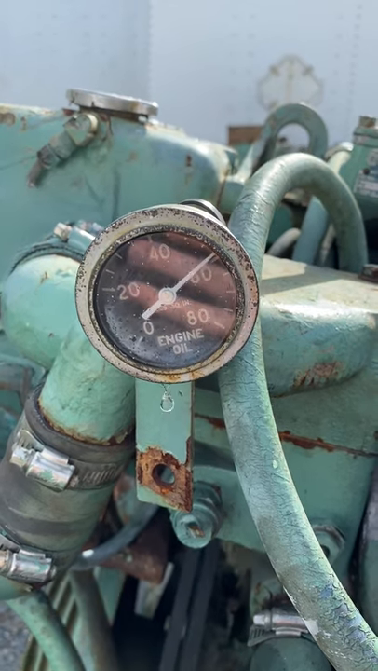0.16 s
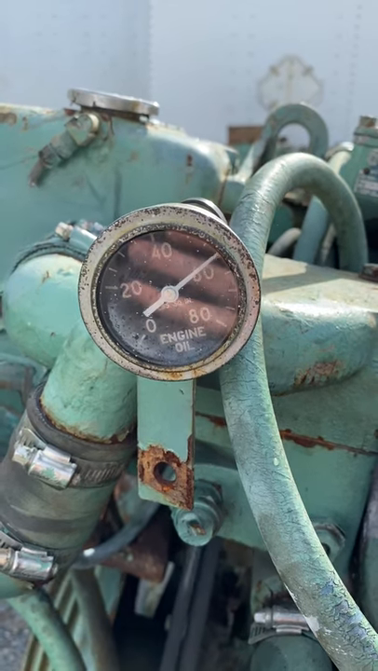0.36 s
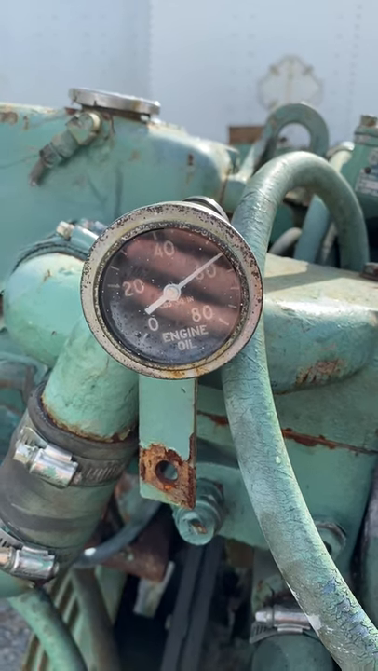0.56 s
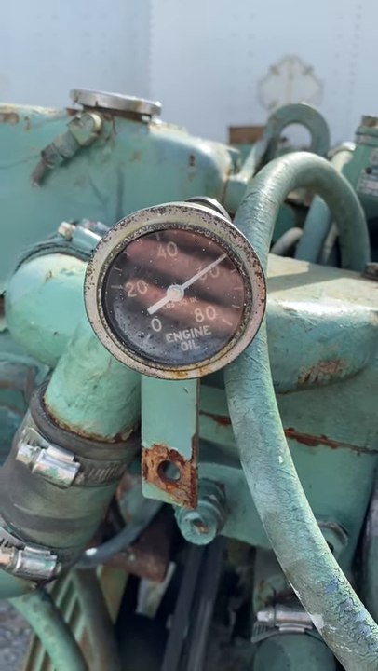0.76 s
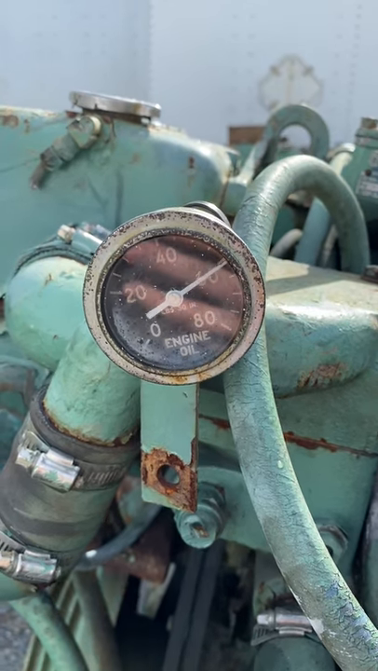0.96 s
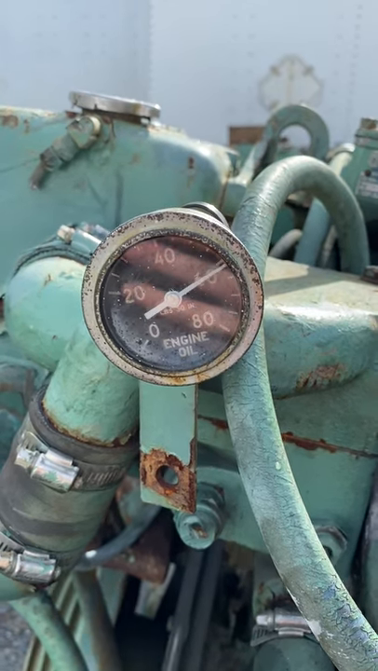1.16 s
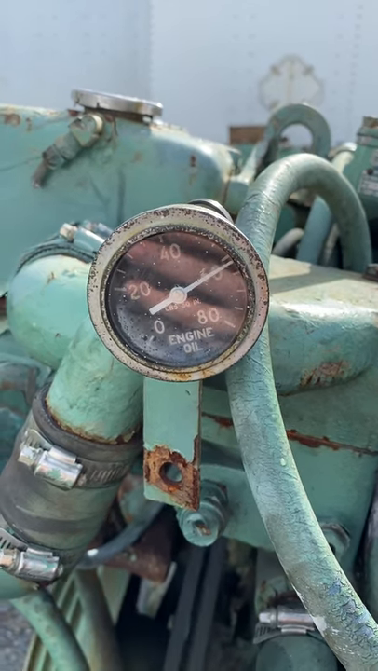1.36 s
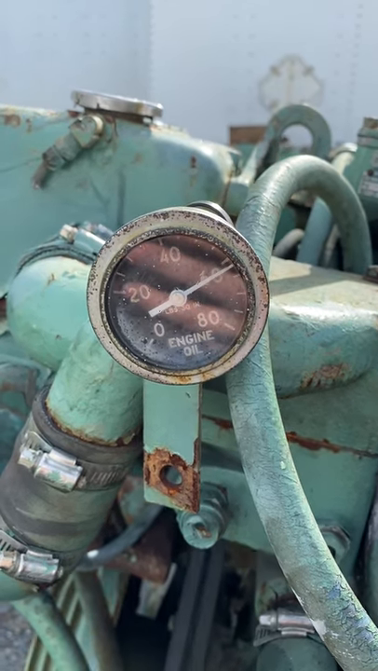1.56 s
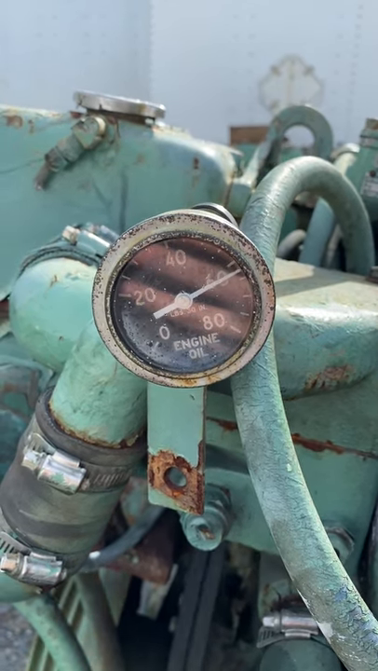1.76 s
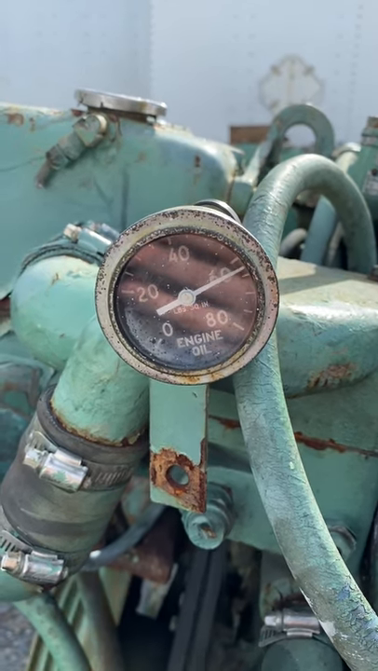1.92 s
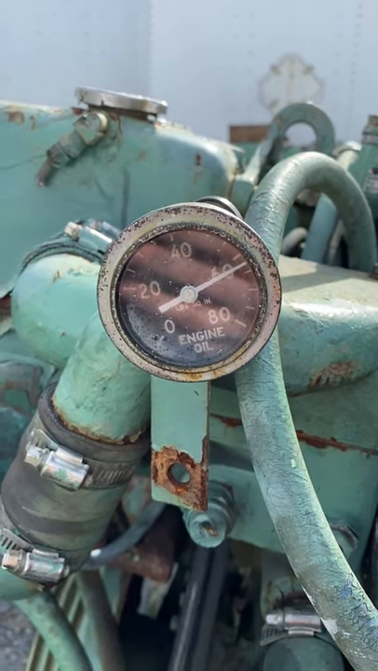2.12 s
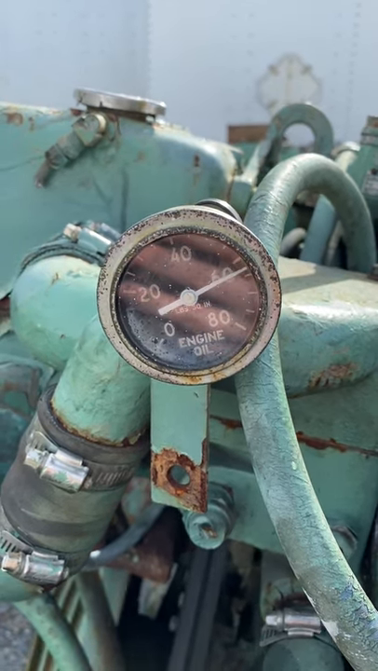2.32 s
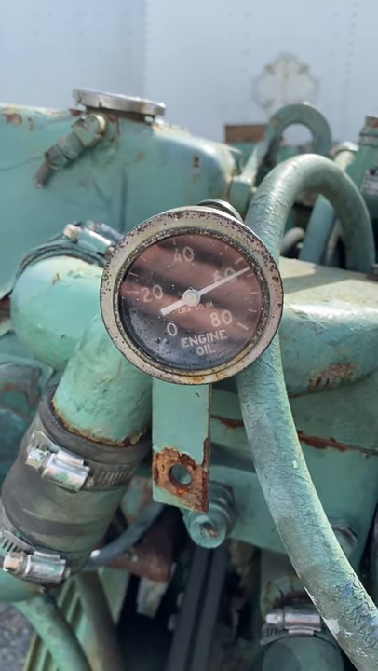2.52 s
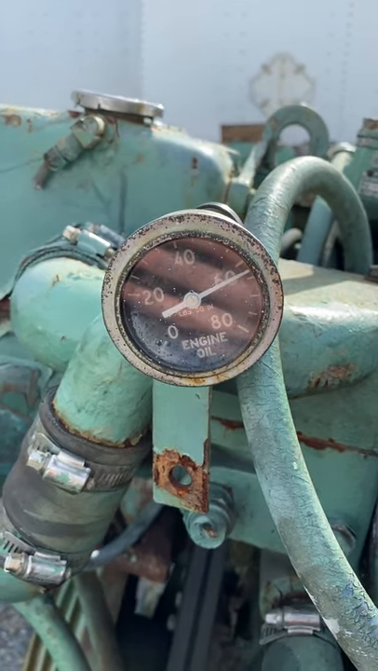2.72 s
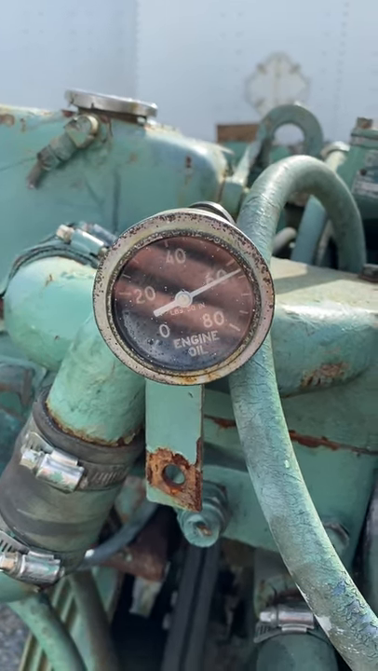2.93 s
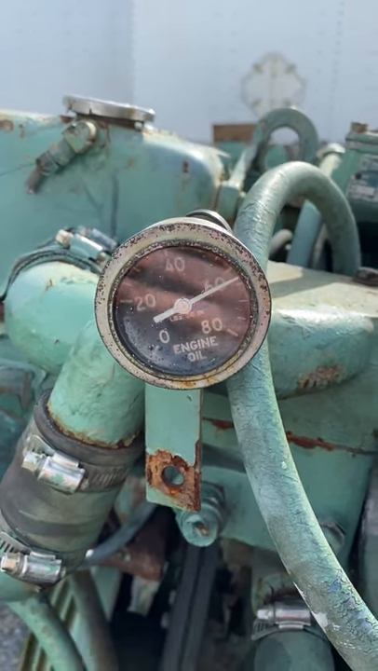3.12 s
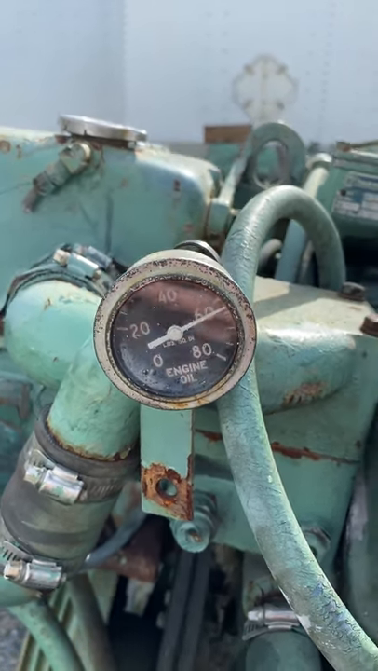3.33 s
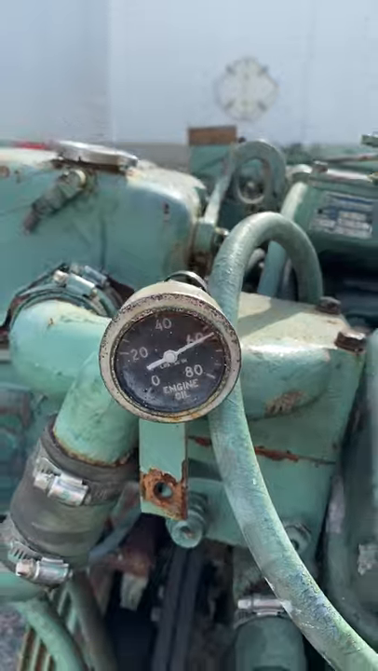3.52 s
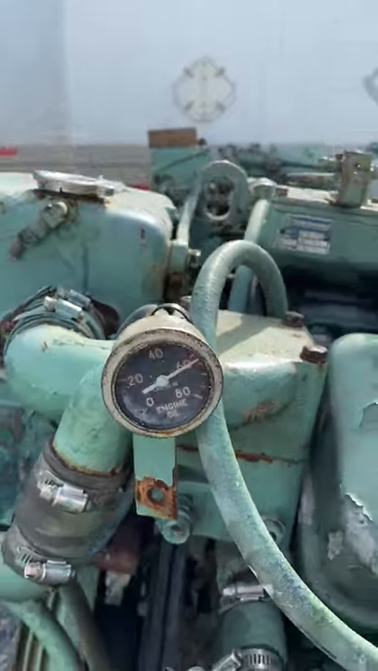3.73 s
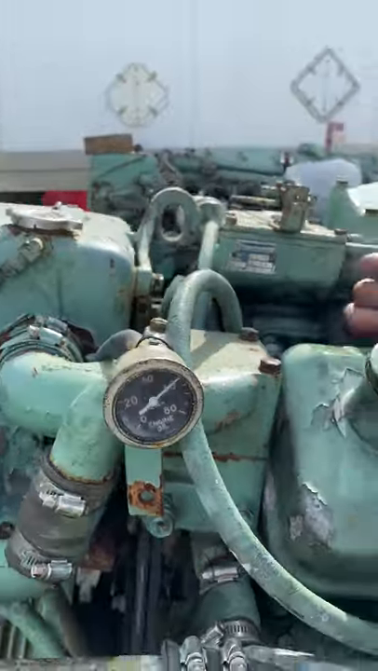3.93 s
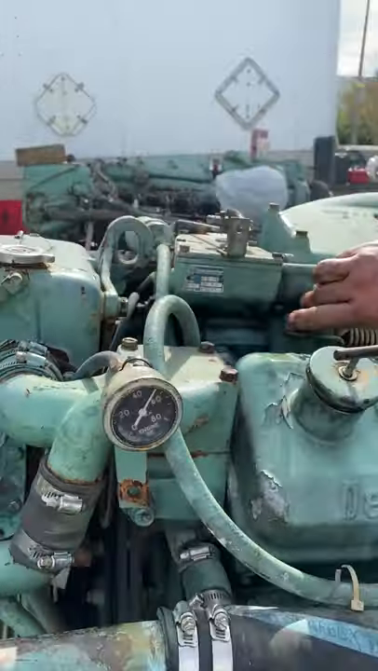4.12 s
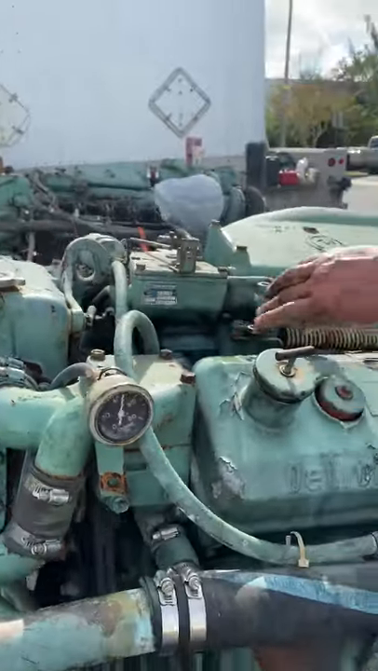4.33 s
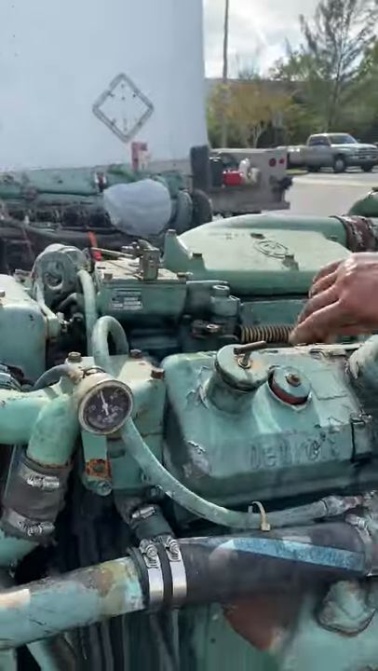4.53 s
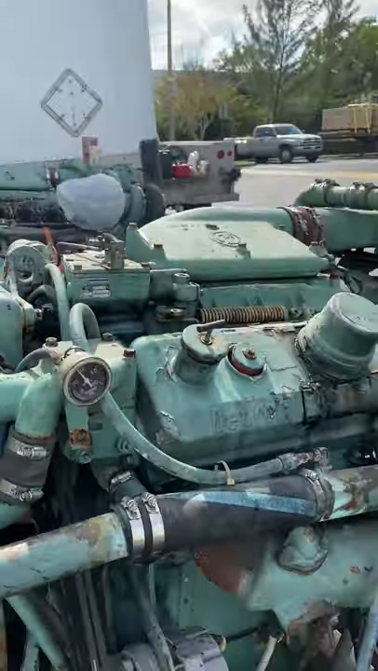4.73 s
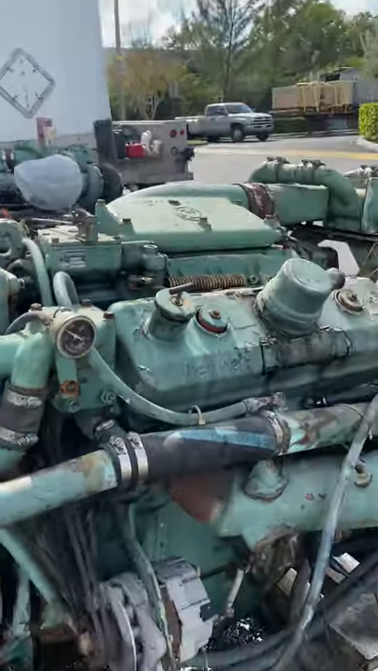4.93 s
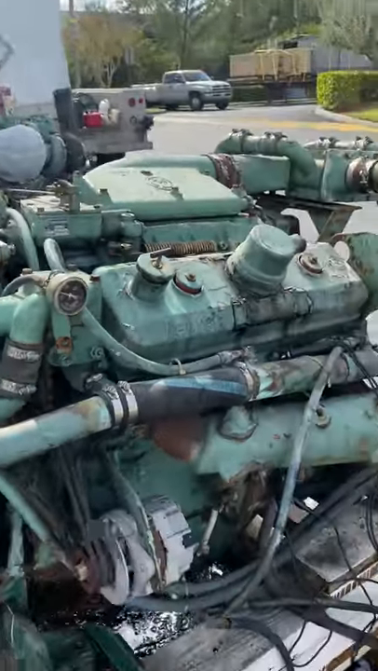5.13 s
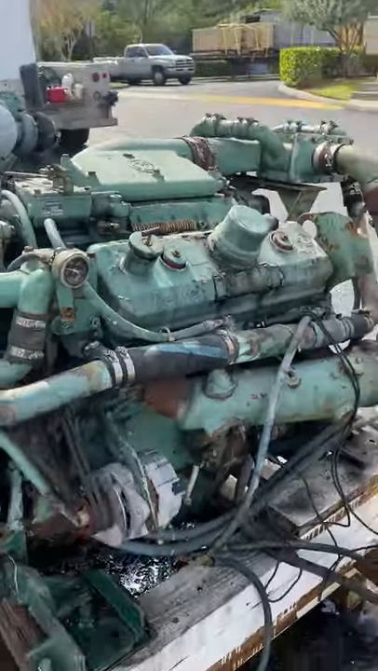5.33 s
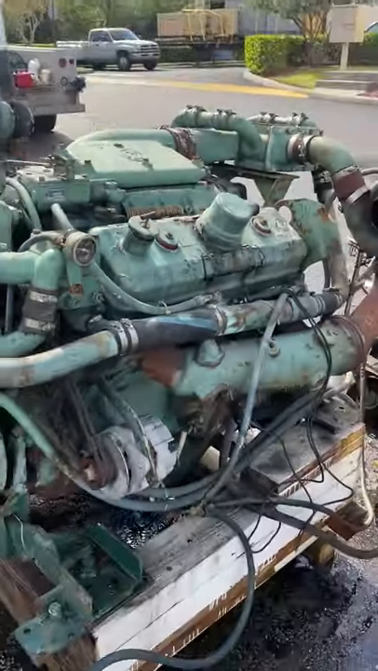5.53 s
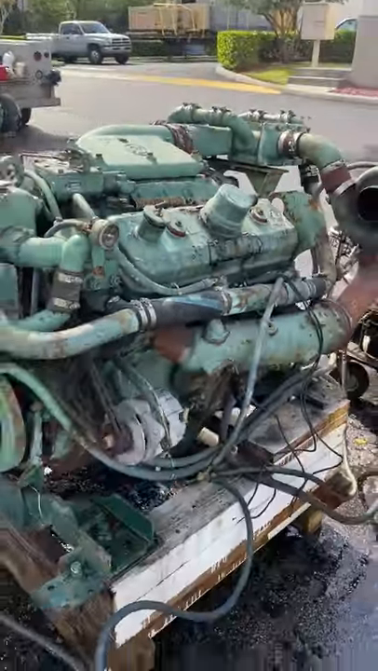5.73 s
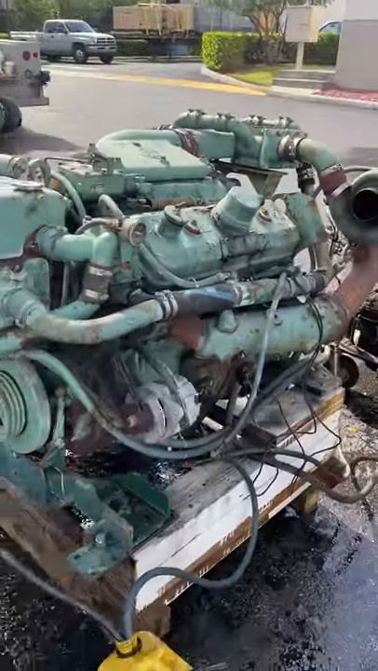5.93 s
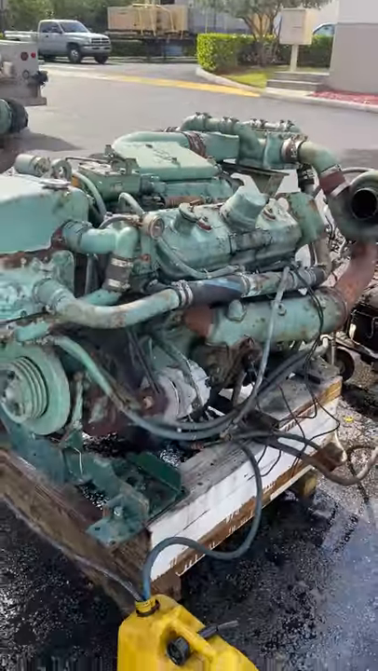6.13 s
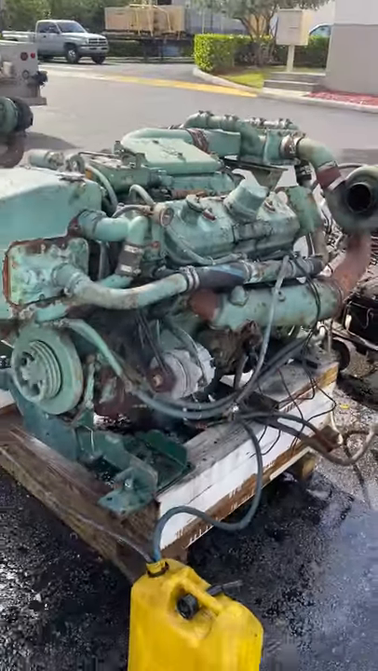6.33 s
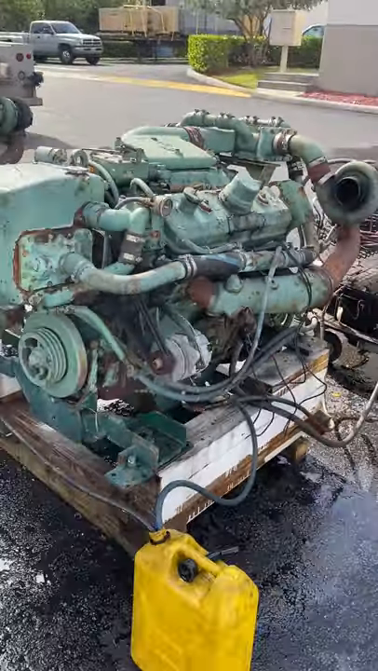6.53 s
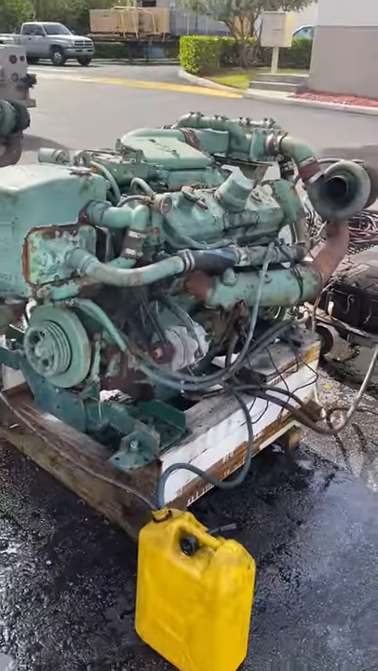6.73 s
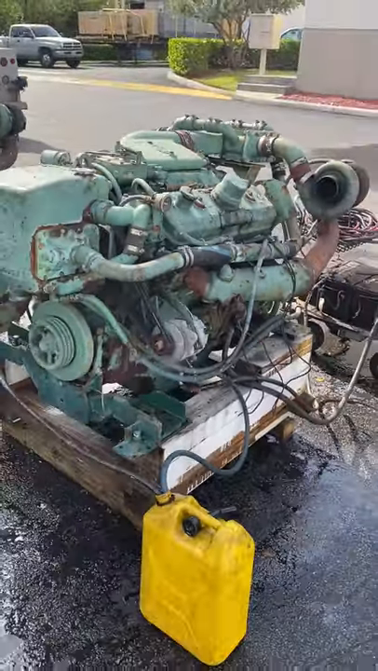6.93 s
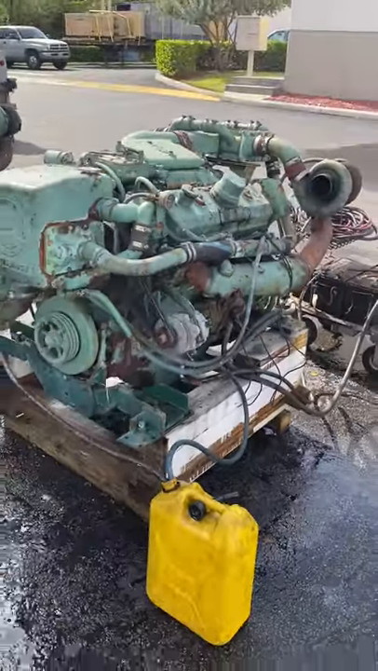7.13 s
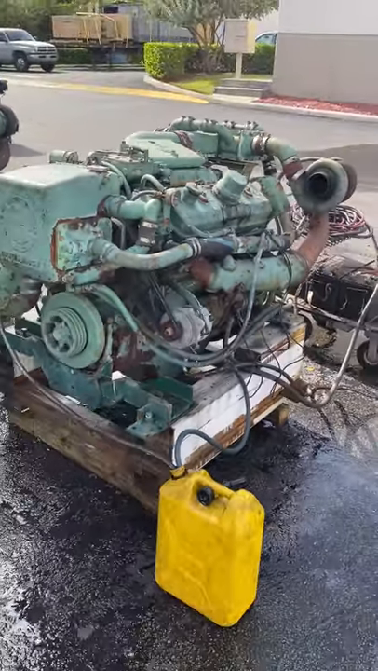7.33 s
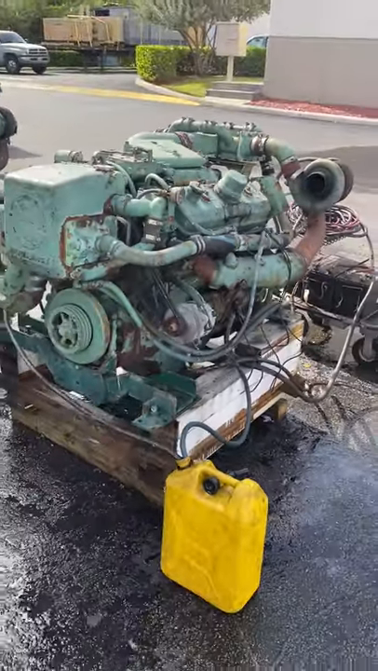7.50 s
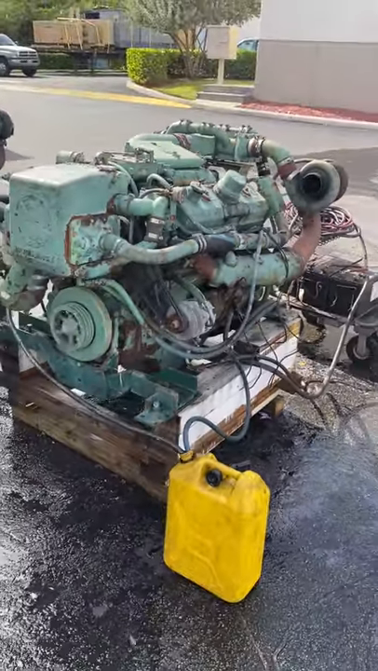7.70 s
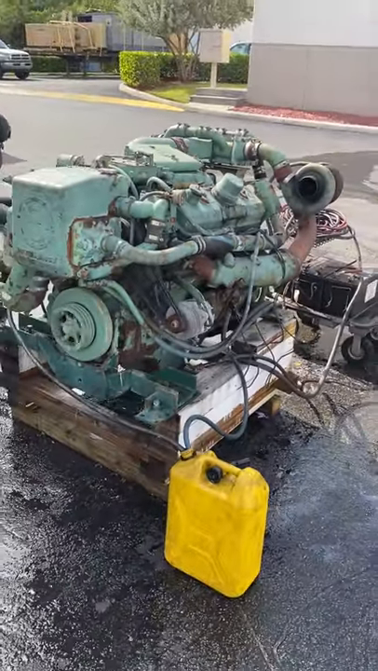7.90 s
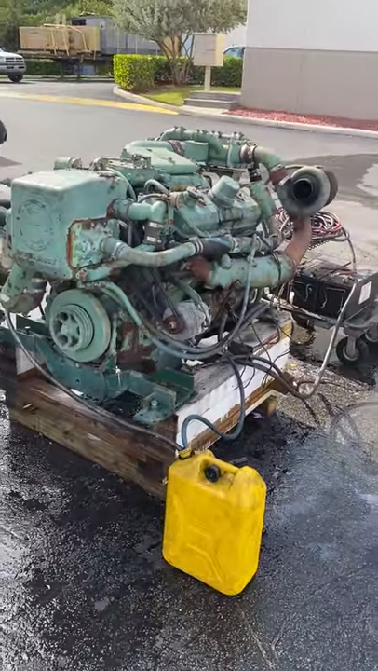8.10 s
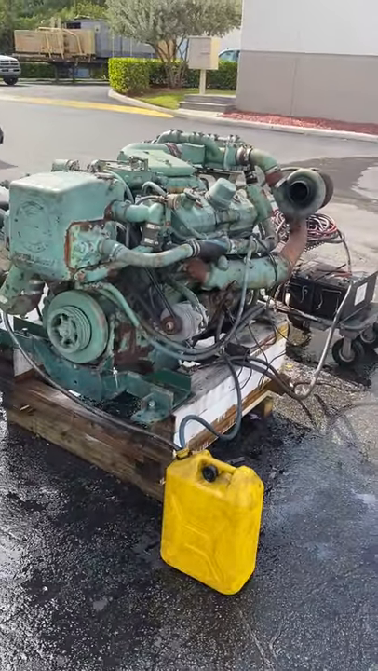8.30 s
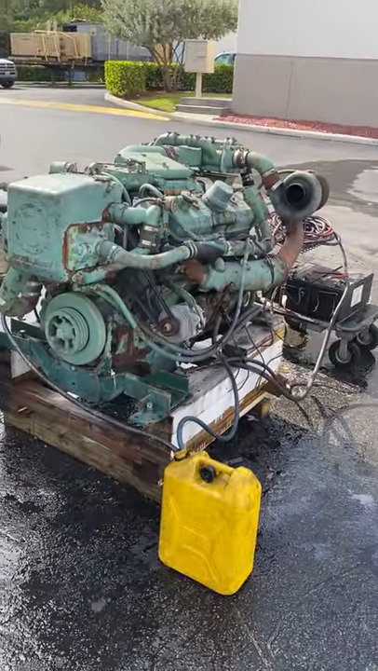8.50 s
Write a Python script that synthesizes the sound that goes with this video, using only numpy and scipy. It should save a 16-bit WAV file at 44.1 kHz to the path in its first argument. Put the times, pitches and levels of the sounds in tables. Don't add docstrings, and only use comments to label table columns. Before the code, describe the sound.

Loud throbbing diesel engine at raised revs winds down quickly, nearly stalls, then chugs on at a slow, clattering idle as the listener backs away.

```python
import sys
import numpy as np
from scipy import signal
from scipy.io import wavfile
from scipy.ndimage import uniform_filter1d

SR = 44100
rng = np.random.default_rng(int(sys.argv[2]) if len(sys.argv) > 2 else 0)


def linear_from_db(decibels):
    return 10 ** (np.asarray(decibels, float) / 20)


def generate_wav(signal):
    frames = np.transpose(np.atleast_2d(signal))
    scaled = np.clip(frames, -1, 1) * 32767
    pcm = np.round(scaled).astype(np.int16)
    wavfile.write(sys.argv[1], SR, pcm)


N = 377275
TIME = np.arange(N) / SR
FFT_SIZE, HOP = 1024, 256
HZ, FRAME_S = np.fft.rfftfreq(FFT_SIZE, 1 / SR), np.arange(N // HOP + 2) * HOP / SR

# time_s, speed_turns_per_s
CRANK_SPEED = [(0, 20.391), (.29, 20.809), (.92, 21.014), (1.28, 22.752), (2.02, 22.937), (2.49, 23.858),
               (3.54, 23.699), (3.84, 20.026), (4.23, 15.939), (4.62, 12.282), (4.92, 9.953), (5.38, 11.27),
               (5.56, 11.546), (6.22, 11.292), (7.56, 11.272), (8.56, 11.149)]
FLYWHEEL_S = 0.1
# time_s, level_db
EFFORT = [(0, -14.5), (.16, -14), (.8, -14), (1.26, -13), (1.62, -15.5), (2.38, -14.5), (3.52, -15.5),
          (3.64, -19), (3.76, -20), (4.07, -22.5), (4.45, -24.5), (4.83, -27), (5.05, -22.5), (5.25, -22),
          (5.86, -25), (6.79, -26.5), (7.98, -26.5), (8.55, -26)]
HELD_DB, HELD_SPEED = -14.5, 22.5
# time_s, fuel_cut_0_to_1, overload_0_to_1
GOVERNOR = [
    (0, 0, 0),
    (3.52, 0, 0),
    (3.7, 1, 0),
    (4.75, 1, 0),
    (4.9, 0, 1),
    (5.8, 0, 1),
    (6.3, 0, 0),
]
# speed_turns_per_s, range (0 idle, 1 low, 2 middle, 3 high)
REV_RANGES = [(12, 0), (20, 1), (21.05, 1), (22.7, 2), (23, 2), (23.7, 3)]
# time_s, distance (0 near, 1 far), right_port_shading (0-1)
WALK = [
    (0, 0.16, 0.24),
    (3.5, 0.026, 0.19),
    (4.5, 0.61, 0.44),
    (5.5, 0.58, 0.53),
    (6.5, 0.7, 0.57),
    (8.6, 0.79, 0.43),
]

# idle_db, low_db, middle_db, high_db (rms)
THROB_DB = [(-82.5, -53.0, -57.0, -52.0), (-73.5, -48.5, -41.0, -56.0), (-45.5, -30.0, -24.0, -29.5),
            (-48.0, -47.5, -42.0, -47.0), (-43.5, -26.5, -29.0, -39.5), (-36.5, -30.0, -25.0, -25.0),
            (-27.5, -16.5, -19.0, -22.5), (-42.5, -21.5, -19.0, -19.0), (-40.0, -33.5, -36.5, -47.5),
            (-38.5, -25.5, -26.0, -31.5), (-41.5, -21.5, -18.5, -25.5), (-42.5, -29.5, -38.0, -41.5),
            (-40.0, -28.5, -44.5, -47.0), (-45.0, -34.0, -29.5, -32.0), (-39.0, -37.5, -29.5, -34.0),
            (-40.0, -33.5, -38.0, -48.0), (-42.5, -37.5, -39.5, -36.5), (-49.5, -31.0, -30.0, -44.5)]
# idle_db, low_db, middle_db, high_db (rms)
GROWL_DB = [(-35.5, -26.0, -19.5, -25.0), (-39.0, -29.0, -34.0, -34.5), (-35.0, -32.5, -31.0, -31.5),
            (-34.0, -37.0, -33.0, -42.0), (-36.0, -27.5, -36.5, -40.5), (-33.0, -34.0, -39.5, -50.5),
            (-40.0, -34.0, -55.5, -36.5), (-47.5, -42.5, -34.5, -37.5), (-46.0, -36.0, -32.0, -39.0),
            (-52.0, -40.0, -31.5, -44.0), (-42.5, -37.0, -33.5, -42.5), (-42.5, -45.0, -32.5, -38.5),
            (-40.5, -37.0, -33.0, -41.0), (-44.0, -39.0, -35.0, -43.5), (-42.5, -35.5, -30.5, -35.5),
            (-44.0, -35.0, -35.0, -33.0), (-40.0, -32.5, -43.0, -50.5)]
BLOWER_ORDERS = [12.31, 13.32, 17.63, 18.47, 22.63, 24.63, 25.63, 26.62]
# idle_db, low_db, middle_db, high_db (rms)
BLOWER_DB = [(-64.5, -33.5, -36.0, -41.5), (-70.0, -43.5, -42.0, -40.0), (-70.5, -56.5, -54.0, -43.5),
             (-76.0, -31.0, -27.5, -30.0), (-50.5, -36.0, -35.5, -58.0), (-59.0, -47.0, -37.5, -41.5),
             (-52.5, -48.0, -40.5, -39.0), (-67.5, -45.0, -37.0, -43.0)]
GEAR_ORDERS = [37, 38, 39, 41, 43, 44, 45, 48, 49, 52, 53, 55, 59, 61, 63, 64, 66, 68, 69, 70, 71, 72, 73,
               74, 75, 76, 77, 78, 79, 80, 81, 82]
# idle_db, low_db, middle_db, high_db (rms)
GEAR_DB = [(-49.0, -43.5, -39.5, -41.0), (-47.0, -37.0, -44.5, -48.0), (-53.0, -33.0, -39.5, -46.0),
           (-58.0, -39.5, -49.0, -49.5), (-58.0, -39.0, -45.5, -49.5), (-65.5, -53.5, -42.5, -52.0),
           (-55.0, -44.0, -47.0, -51.0), (-50.0, -41.0, -48.5, -43.5), (-46.0, -48.5, -37.5, -42.0),
           (-49.0, -44.0, -41.0, -48.0), (-73.5, -38.0, -48.0, -41.5), (-51.5, -39.0, -37.5, -39.5),
           (-46.0, -48.0, -40.0, -50.5), (-51.0, -62.0, -38.5, -48.5), (-50.0, -44.5, -47.0, -50.0),
           (-51.5, -43.5, -45.5, -46.5), (-55.5, -44.5, -39.0, -40.0), (-59.5, -38.5, -47.0, -46.5),
           (-55.5, -49.5, -42.0, -50.5), (-70.0, -47.0, -37.5, -40.5), (-52.0, -41.0, -55.0, -47.0),
           (-51.5, -41.0, -37.5, -50.0), (-53.0, -42.5, -40.5, -45.5), (-57.0, -37.0, -37.5, -54.0),
           (-68.0, -40.0, -43.0, -46.0), (-53.5, -44.0, -41.5, -45.5), (-62.5, -44.0, -33.5, -48.5),
           (-46.5, -30.5, -33.5, -42.0), (-56.5, -42.0, -34.5, -40.5), (-59.0, -43.0, -53.5, -54.5),
           (-49.5, -43.0, -46.5, -46.5), (-56.5, -46.5, -40.0, -50.0)]
FUELLED_ORDERS = [2, 3, 4, 7, 9, 11, 12, 13, 14, 15, 16, 18, 19, 20, 21, 23, 24, 26, 30, 32, 34, 36]
# coasting_db, overload_db
FUELLED_DB = [(-14, 8), (-13, 6), (3, -4), (5.5, -2), (-0.5, -15), (5.5, -14), (2.5, 11.5), (17, 6),
              (7, 4.5), (3, 4), (8.5, 8), (6, 2), (7.5, 6), (1.5, 5), (1, -9), (3, -5), (3, 0.5), (-4, -3),
              (-1, -13), (8.5, -16), (-9, -9), (5, -22)]
COAST_KEEP, COAST_DB = 0.57, -20
BEATS = [(3, 6, .7, .25, .25, .23), (7, 9, .41, .41, .39, .39), (10, 13, .2, .98, .75, .72),
         (14, 18, .8, 0, .83, .8), (19, 20, .1, .62, .7, .05), (21, 21, .1, .62, 1, 1.066),
         (22, 24, .1, .62, 1, 1.05), (25, 29, .92, .67, .68, .15), (30, 33, .13, .03, 0, .02),
         (34, 38, .12, .03, .52, .3), (41, 49, .63, .3, .33, .33), (52, 55, .1, .68, .73, .6),
         (76, 81, .9, .1, .15, .16)]
# pitch_hz, level_db
PIPE = [(50, 2.5), (110, -3), (160, 3.5), (230, 4), (290, -3), (340, -5.5), (420, 0), (520, -7), (650, -6),
        (1100, -5), (1400, -23), (1550, -2), (1800, -9)]
# pitch_hz, level_db
GROUND = [(90, 1.5), (135, 12), (215, -9), (280, 2.5), (325, 5), (347, 3), (380, 0), (392, 2), (403, 10),
          (426, 18), (460, -10), (520, -12), (600, 0.5)]

# pitch_hz, near_db_per_hz, far_db_per_hz
BODY = [(40, -62.5, -50), (210, -54.5, -56), (400, -48, -57.5), (480, -44.5, -63.5), (682, -45, -64.5),
        (977, -58, -65), (1250, -57.5, -67), (1600, -61.5, -71.5), (2300, -62.5, -75.5), (3760, -67.5, -84),
        (5700, -73, -83), (8480, -77.5, -92.5), (10900, -83.5, -104), (13000, -81.5, -102),
        (15500, -80, -99)]
# centre_hz, effort_db_per_db, speed_db_per_octave, far_db
FOLLOW = [
    (600, 1.45, 0.5, 17.5),
    (1700, 1.42, -2.5, 12.5),
    (5500, 0.87, 5, 15),
]
# pitch_hz, width_hz, level_db
COAST_RINGS = [(453, 63, 12), (754, 36, 3.5), (1255, 44, 7), (1460, 64, -6), (2840, 1650, 3),
               (8650, 900, 3.5), (12200, 1100, 10)]
# pitch_hz, share (0-1)
REPEATS = [(300, 0.84), (600, 0.91), (1000, 0.6), (2000, 0.43), (2800, 0.49), (4200, 0.074), (6000, 0.011)]
# crank_angle_turns, pitch_hz, t60_s, near_db, far_db
KNOCKS = [(0.14, 1600, 0.027, -5, -21), (.3, 1184, 0.025, -0.5, -17), (.7, 1150, 0.024, -3, -1.5),
          (.79, 1400, 0.06, -17, -6), (.55, 1740, 0.063, -10, 2.5), (0.0488, 1450, 0.032, -31, 10),
          (.88, 2300, 0.051, -8, -3), (.79, 3780, 0.041, -10.5, 15), (0.5, 4100, 0.016, -18, -2),
          (.1, 2300, 0.026, -7, 5), (0.81, 1700, 0.017, -15, -14), (1, 2800, 0.021, -10.5, -1.5),
          (.15, 2000, 0.02, -11, 1), (.4, 650, 0.04, -12.5, -5), (0.43, 950, 0.029, -18, -13),
          (.87, 880, 0.047, -7.5, -1), (0.72, 800, 0.035, 0.5, -25), (0.97, 773, 0.026, -2.5, -14),
          (.9, 785, 0.047, -16, 2.5)]
# start_s, peak_db
BUMPS = [
    (.275, -34),
    (0.469, -30),
    (.767, -29),
    (1.063, -25),
    (1.2, -21.5),
    (1.608, -39),
    (2.902, -36),
]
# centre_s, half_length_s, pitch_hz, level_db
SURGES = [
    (4.6, 0.032, 460, 8),
    (2.9, 0.059, 430, -3),
    (4.43, 0.045, 460, 8),
    (4.73, 0.053, 470, -8),
    (6.4, 0.063, 150, 4),
]
# start_s, peak_db
SNAPS = [(4.1338, -37), (4.1657, -35), (4.226, -35), (4.2555, -37), (4.2886, -32), (4.3203, -33),
         (4.3872, -30.5), (4.4545, -30), (4.4889, -33), (4.5289, -35), (4.5658, -32), (4.6032, -34),
         (4.6401, -31), (4.6815, -35), (4.7249, -35), (4.7683, -40), (4.8162, -39), (4.8596, -39)]
# start_s, peak_db
TICKS = [(4.9732, -33), (5.0709, -31), (5.1652, -37), (5.2575, -34), (5.3473, -34), (5.4356, -37),
         (5.5234, -41), (5.612, -43), (5.6955, -43), (5.7878, -42), (5.8726, -40), (5.9589, -38),
         (6.0497, -40), (6.1335, -37), (6.2153, -41), (6.305, -43), (6.393, -43), (6.4882, -42),
         (6.575, -43), (6.664, -44), (6.7536, -42), (6.8424, -44), (6.9312, -43), (7.0235, -43),
         (7.1108, -38), (7.2026, -37), (7.2859, -36), (7.3752, -38), (7.46, -40), (7.548, -37),
         (7.6406, -36), (7.7294, -38), (7.8187, -38), (7.907, -36), (7.9963, -38), (8.0856, -39),
         (8.1754, -41), (8.2647, -38), (8.3545, -39), (8.4443, -40), (8.5326, -35)]
# start_s, peak_db, pitch_hz
CLACKS = [(4.984, -28, 1630), (5.0255, -32, 1280), (5.074, -27, 1390), (5.167, -23.5, 1270),
          (5.2606, -30, 1190), (5.319, -29, 1210), (5.353, -26, 1210), (5.44, -30.5, 1580),
          (5.4836, -32, 1220), (5.527, -30, 1410), (5.6144, -31, 1710), (5.698, -32, 1420),
          (5.762, -32, 1700), (5.7884, -32, 1250), (5.8508, -30, 1710), (5.8762, -32, 1710),
          (5.9012, -32, 1420), (5.9394, -35, 1730), (6.027, -35, 1720), (6.079, -31, 1430),
          (6.1177, -34, 1250), (6.1711, -32, 1940), (6.221, -36, 1390), (6.2803, -35, 1460),
          (6.3112, -33, 1360), (6.3402, -35, 1420), (6.401, -33, 1520), (6.429, -35, 1400),
          (6.4707, -33, 1740), (6.5178, -38, 1600), (6.5791, -32, 1200), (6.6061, -38, 1400),
          (6.6684, -33, 1660), (6.6945, -31, 1410), (6.7547, -31, 1360), (6.792, -32, 2080),
          (6.8455, -32, 1530), (6.9335, -33, 1530), (7.0206, -34, 1360), (7.0516, -33, 1410),
          (7.1094, -29, 1560), (7.2002, -31, 1540), (7.2883, -31, 1230), (7.377, -30.5, 1550),
          (7.465, -30, 1290), (7.5544, -29, 1260), (7.6417, -27, 1270), (7.732, -28, 1320),
          (7.8205, -30, 1320), (7.9096, -29, 1490), (8, -27, 1490), (8.0882, -29, 1650), (8.176, -27, 1390),
          (8.2673, -27, 1270), (8.3551, -29, 1380), (8.4464, -28, 1490), (8.5347, -27, 1520)]

# pitch_hz, likeness (0-1)
SAME = [(60, 1), (170, 0.99), (340, 0.99), (520, 0.91), (700, 0.76), (1100, 0.66), (1750, 0.98),
        (2100, 0.92), (2700, 0.65), (3900, 0.041), (4700, 0.24), (4950, 0.34), (5300, 0.34), (5700, 0.32),
        (6200, 0.99), (8600, 0.87), (10000, 0.077)]
# pitch_hz, lead_radians
LEAD = [(200, 0), (400, -.1), (690, -.5), (1030, -.05), (1290, -.3), (2300, .4), (3100, 1.7), (3880, 1.6),
        (4750, 3.14), (4950, 3.3), (5510, 6.5), (5900, 7), (9500, 8.2), (11000, 9.4)]
# pitch_hz, difference_db
SHADE = [(220, -1.5), (350, 0), (520, 11), (700, 20), (1100, 15), (1400, 7.5), (1800, 5.5), (2400, 0),
         (5000, 0.5)]
# pitch_hz, difference_db
FRONT = [(220, 1), (350, -1), (500, -3), (700, -8.5), (1200, -1.5), (2000, -3), (2700, -2.5), (4800, -3),
         (5700, -0.5)]


def evened(x):
    return x / np.sqrt(np.mean(x ** 2, -1, keepdims=True) + 1e-20)


def curve(rows, t, order=1):
    columns = np.transpose(rows)
    return np.interp(t, columns[0], columns[order])


def read(rows, order=1):
    columns = np.transpose(rows)
    return np.interp(np.log(HZ + 1), np.log(columns[0] + 1), columns[order])[:, None]


def shaped(x, gain):
    overlap = FFT_SIZE - HOP
    z = signal.stft(x, nperseg=FFT_SIZE, noverlap=overlap)[2][..., :len(FRAME_S)]
    return signal.istft(z * gain[..., :z.shape[-1]], nperseg=FFT_SIZE, noverlap=overlap)[1][..., :N]


def wander(count, samples):
    once = uniform_filter1d(rng.standard_normal(count), int(samples))
    return evened(uniform_filter1d(once, int(samples)))


def drift(samples):
    return wander(N, samples)


def speed(t):
    return uniform_filter1d(curve(CRANK_SPEED, t), round(FLYWHEEL_S / (t[1] - t[0])), mode="nearest")


def crank():
    return np.cumsum(speed(TIME)) / SR + 0.00068 * drift(1500)


def order_sizes(rows, t):
    extra_db = np.zeros((len(rows), 2))
    extra_db[np.array(FUELLED_ORDERS) - 2] = FUELLED_DB
    in_range = np.maximum(1 - abs(curve(REV_RANGES, speed(t)) - np.arange(4)[:, None]), 0)
    held = linear_from_db(rows[:, 1:]) @ in_range
    coasting = linear_from_db(COAST_KEEP * rows[:, 2:].mean(1) + COAST_DB + extra_db[:, 0])[:, None]
    loaded = linear_from_db(rows[:, 1] + extra_db[:, 1])[:, None]
    cut, load = curve(GOVERNOR, t), curve(GOVERNOR, t, order=2)
    return held * (1 - cut - load) + coasting * cut + loaded * load


def coloured_sizes(rows, t, rough_db=1.1, choke_db=-10, slow_gear_db=-3.5):
    size, cut = order_sizes(rows, t), curve(GOVERNOR, t)
    hz = rows[:, :1] * speed(t)
    for k, order in enumerate(rows[:, 0]):
        waver = wander(len(t), 16)
        flutter_db = rough_db * waver * (24.5 < order < 90)
        size[k] *= linear_from_db(cut * (curve(PIPE, hz[k]) + 2.8 * waver) + flutter_db)
    echo = (np.clip((t - 6.6) / 1.2, 0, 1) - 0.4) * np.clip((t - 6.1) / 0.4, 0, 1)
    size *= linear_from_db(curve(GROUND, hz) * echo)
    size[11] *= linear_from_db(choke_db * cut * np.clip(speed(t) - 17.5, 0, 1))
    size *= linear_from_db(slow_gear_db * (rows[:, :1] > 36.5) * (speed(t) < 13))
    return size * linear_from_db(curve(EFFORT, t)) / np.sqrt((size ** 2 * (hz < 400)).sum(0))


def order_phases(rows, scatter=0.2):
    phase = rng.random((len(rows), 5))
    phase[:, 1:4] = phase[:, :1]
    order = rows[:, 0]
    for first, last, *at in BEATS:
        group = (order >= first) & (order <= last) & (order % 1 == 0)
        loose = scatter * (first > 9) * (phase[group, :4] - 0.5)
        phase[group, :4] = -rows[group, :1] * at + loose
    phase[:, :4] = np.unwrap(phase[:, :4], period=1)
    return phase


def tones(angle, chop=0.05):
    orders = np.r_[2:37, BLOWER_ORDERS, GEAR_ORDERS]
    rows = np.c_[orders, np.r_[THROB_DB, GROWL_DB, BLOWER_DB, GEAR_DB]]
    t = TIME[::64]
    size, phase = coloured_sizes(rows, t), order_phases(rows)
    slow_time, slow_angle = TIME[::4], angle[::4]
    ranged = curve(REV_RANGES, speed(slow_time))
    chopped = 1 + chop * np.clip(ranged - 1, 0, 1) * np.cos(2 * np.pi * (slow_angle - 0.12))
    out = np.zeros((2, len(slow_time)))
    for order, gain, (*range_phase, path_phase) in zip(orders, size, phase):
        turn = np.exp(2j * np.pi * order * slow_angle) * np.interp(slow_time, t, gain)
        if order > 50:
            turn = turn * chopped
        turn *= np.exp(2j * np.pi * np.interp(ranged, range(4), range_phase))
        out += (turn * np.exp(2j * np.pi * np.array([[0], [path_phase]]))).real
    return np.sqrt(2) * signal.resample_poly(out, 4, 1, axis=1)[:, :N]


def rush(angle, blower_db=1.14, puff_db=0.73, gust_db=0.5):
    beat = 2 * np.pi * (2.06 * angle - 0.39)
    swell_db = blower_db * (np.cos(beat) + 0.51 * np.cos(2 * beat))
    swell_db += puff_db * drift(160) + gust_db * drift(1450)
    return rng.standard_normal((2, N)) * linear_from_db(swell_db)


def blows(angle, at_turns, spread_db):
    passes = np.diff(np.floor(angle - at_turns), prepend=0) > 0
    return passes * linear_from_db(spread_db * rng.standard_normal(400))[angle.astype(int).clip(0)]


def clatter(angle, firing_t60=0.082, spread_db=1.34):
    t, out = np.arange(2800) / SR, np.zeros((2, N))
    for k in range(8):
        ring = rng.standard_normal((2, len(t))) * linear_from_db(-60 * t / firing_t60) * np.minimum(t / 0.0012, 1)
        force = blows(angle, k / 8 + 0.0401, spread_db)
        out += signal.oaconvolve(force[None], ring, axes=1)[:, :N]
    power_per_blow = firing_t60 * SR / (2 * np.log(1000))
    return out / np.sqrt(8 * power_per_blow * speed(TIME) / SR)


def knocks(angle, knock_db=11, spread_db=2.0, fuel_cut_db=-7, idle_db=4.5, tick_end_s=4.1):
    t, out, far = np.arange(1500) / SR, np.zeros((2, N)), curve(WALK, TIME)
    for at, hz, t60, near_db, far_db in KNOCKS:
        tick = hz > 3000
        detunes = (0.94, 1.0, 1.06) if tick else (0.955, 1.0, 1.04)
        rise_s = 0.0025 if tick else 0.006
        modes = sum(np.sin(2 * np.pi * (hz * k * t + rng.random((2, 1)))) for k in detunes)
        ring = 0.67 * np.sqrt(hz / SR) * modes * linear_from_db(-60 * t / t60) * np.minimum(t / rise_s, 1)
        force = blows(angle, at, spread_db * (1.25 if tick else 1))
        force = force * linear_from_db(near_db + (far_db + idle_db - near_db) * far)
        if tick:
            force = force * (TIME < tick_end_s)
        out += signal.oaconvolve(force[None], ring, axes=1)[:, :N]
    return out * linear_from_db(knock_db + fuel_cut_db * curve(GOVERNOR, TIME))


def wind(length_s=0.032, rumble_db=-69.0, hz=59.0):
    band = signal.butter(2, [35, 75], "band", fs=SR, output="sos")
    rumble = signal.sosfilt(band, rng.standard_normal((2, N)))
    wide = evened(rumble[0] + [[0.3], [-0.3]] * rumble[1])
    out = wide * linear_from_db(rumble_db + 2.0 * drift(3000) - 11 * curve(WALK, TIME))
    for s, db in BUMPS:
        u = np.maximum(TIME - s, 0) / length_s
        bump = np.sin(np.pi * np.minimum(u, 1)) ** 2
        out += linear_from_db(db + 6.5) * bump * np.sin(2 * np.pi * hz * (TIME - s))
    return out


def surges():
    gain_db = 0
    for s, half_s, hz, db in SURGES:
        gain_db = gain_db + db * np.exp(-((FRAME_S - s) / half_s) ** 2 - ((HZ[:, None] - hz) / 60) ** 2)
    return gain_db


def taps(events, floor_db, boost_db, low, high, t60, rise_s):
    out, t = np.zeros((2, N + 1500)), np.arange(1500) / SR
    fade = linear_from_db(-60 * t / t60) * np.minimum(t / rise_s, 1)
    for s, db, hz in events:
        noise = rng.standard_normal((2, 2000))
        band = signal.butter(2, [low * hz, high * hz], "band", fs=SR, output="sos")
        excess_power = max(linear_from_db(2 * db) - linear_from_db(2 * floor_db), 0)
        size = linear_from_db(boost_db) * np.sqrt(excess_power * np.mean(fade ** 2))
        burst = evened(signal.sosfilt(band, noise)[:, 500:] * fade)
        out[:, round(s * SR):][:, :1500] += size * burst
    return out[:, :N]


def snaps():
    events = [(*row, 4500) for row in SNAPS]
    return taps(events, floor_db=-45, boost_db=-6.0, low=0.41, high=1.4, t60=0.043, rise_s=0.001)


def ticks():
    events = [(*row, 3720) for row in TICKS]
    return taps(events, floor_db=-54, boost_db=-2, low=0.96, high=1.06, t60=0.09, rise_s=0.002)


def clacks():
    return taps(CLACKS, floor_db=-37, boost_db=-3.5, low=0.88, high=1.13, t60=0.1, rise_s=0.002)


def body_spectrum(far):
    body_db = read(BODY) * (1 - far) + read(BODY, order=2) * far + 10 * np.log10(SR / 2)
    effort_db = curve(EFFORT, FRAME_S) - HELD_DB
    octaves = np.log2(speed(FRAME_S) / HELD_SPEED)
    for k, (_, share, octave_db, far_db) in enumerate(FOLLOW):
        part = read(np.c_[np.transpose(FOLLOW)[0], np.eye(3)[k]])
        body_db = body_db + part * (share * effort_db + octave_db * octaves + far_db * far)
    for hz, width_hz, db in COAST_RINGS:
        body_db = body_db + db * curve(GOVERNOR, FRAME_S) * np.exp(-((HZ[:, None] - hz) / width_hz) ** 2)
    return body_db


def ports(paths):
    cancel = 0.96 * curve(WALK, FRAME_S) * np.exp(-((HZ[:, None] - 4800) / 220) ** 2)
    same = np.clip(read(SAME) + cancel, 0, 1)
    shade = np.clip(curve(WALK, FRAME_S, order=2), 0, 1)
    tilt_db = read(SHADE) * shade + read(FRONT) * (1 - shade)
    left = shaped(paths[0], linear_from_db(tilt_db / 2))
    right = shaped(paths[0], same * np.exp(-1j * read(LEAD)) * linear_from_db(-tilt_db / 2))
    right += shaped(paths[1], np.sqrt(1 - same ** 2) * linear_from_db(-tilt_db / 2))
    return np.array([left, right])


def scene():
    angle, far = crank(), np.clip(curve(WALK, FRAME_S), 0, 1)
    body = linear_from_db(body_spectrum(far))
    share = np.clip(read(REPEATS), 0, 1) * (1 - 0.3 * far)
    above_orders = np.clip(HZ[:, None] / speed(FRAME_S) - 35, 0, 3) / 3
    engine = tones(angle)
    engine += shaped(rush(angle), body * np.sqrt(1 - share))
    engine += shaped(clatter(angle), body * np.sqrt(share) * above_orders * linear_from_db(-4.0 * (0.5 - far)))
    engine += shaped(knocks(angle), body * above_orders)
    engine += snaps() + ticks() + clacks()
    return ports(shaped(engine, linear_from_db(surges()))) + wind()


def roll_off(x):
    return signal.sosfilt(signal.butter(12, 15780, fs=SR, output="sos"), x)


def record(dry, leak_db=-5.5, knee=0.95):
    x = signal.sosfilt(signal.butter(3, 38, "high", fs=SR, output="sos"), dry)
    x = x / (1 + abs(x / knee) ** 6) ** (1 / 6)
    full, side = x.mean(0), (x[0] - x[1]) / 2
    low = signal.oaconvolve(full, signal.firwin(81, 10100, window=("kaiser", 5), fs=SR), "same")
    wide = signal.oaconvolve(full, signal.firwin(31, 11300, window=("kaiser", 5), fs=SR), "same")
    mid = low + np.minimum(linear_from_db(leak_db + 4 * drift(900)), 1) * (wide - low)
    mid += linear_from_db(-13.0 + 3.0 * drift(900)) * curve(GOVERNOR, TIME) * (full - wide)
    return roll_off(np.array([mid + side, mid - side]))


dry = scene()
out = record(dry)
generate_wav(out)
```